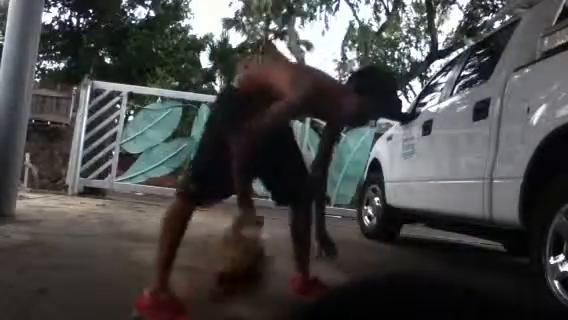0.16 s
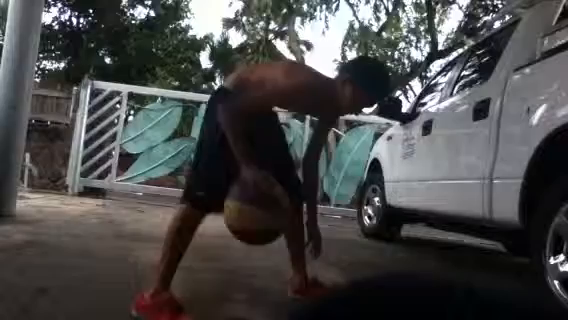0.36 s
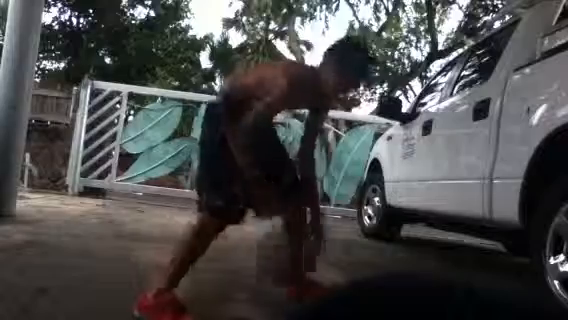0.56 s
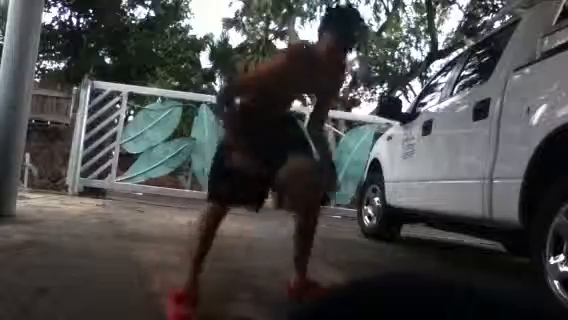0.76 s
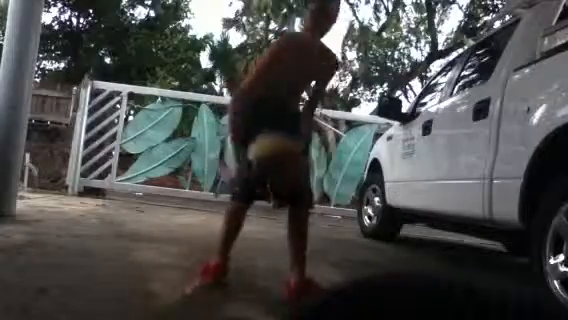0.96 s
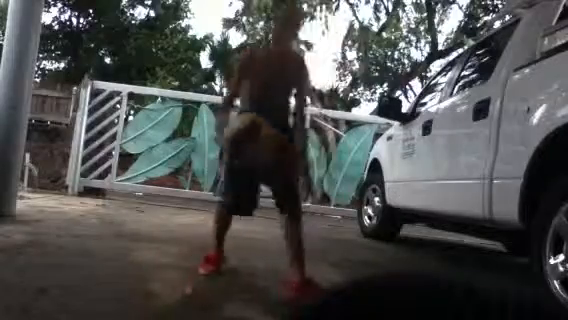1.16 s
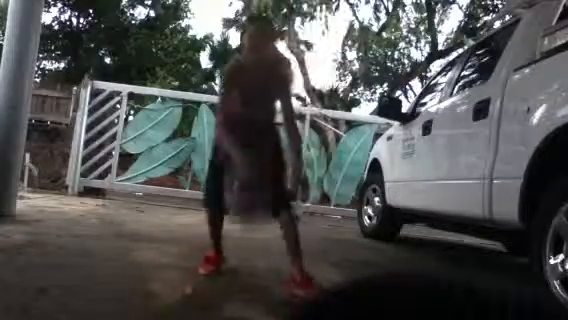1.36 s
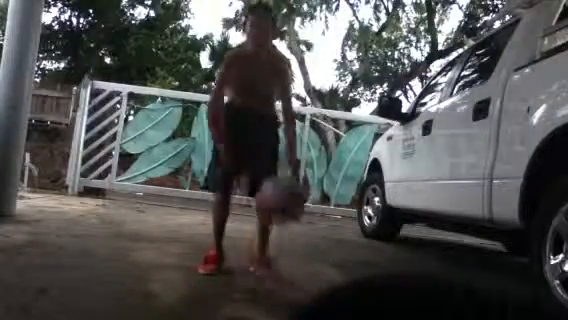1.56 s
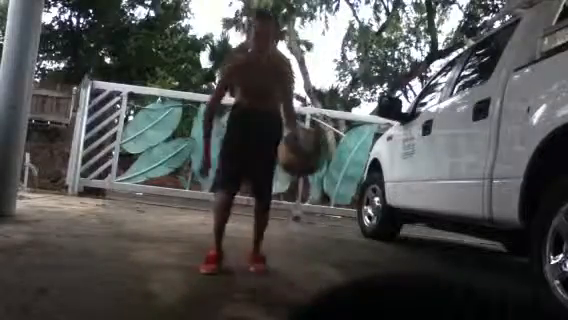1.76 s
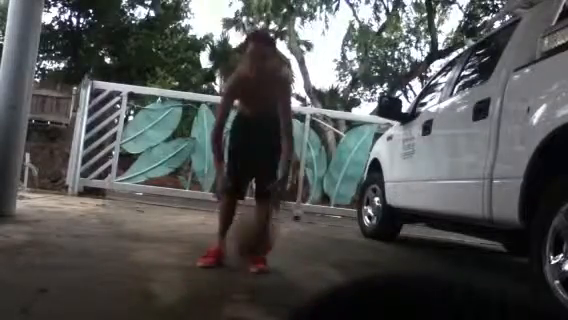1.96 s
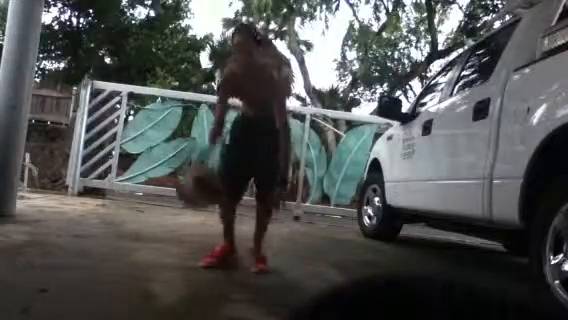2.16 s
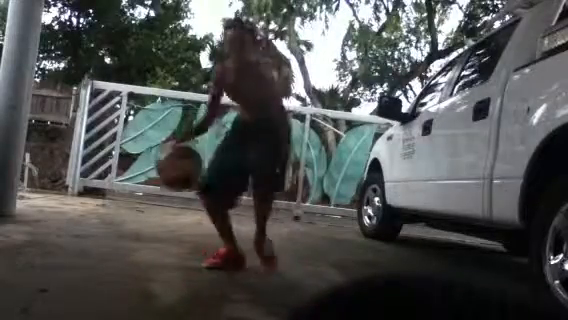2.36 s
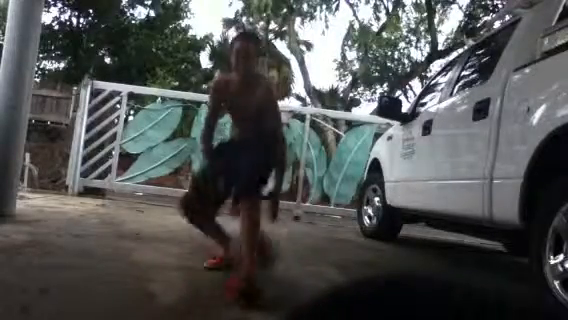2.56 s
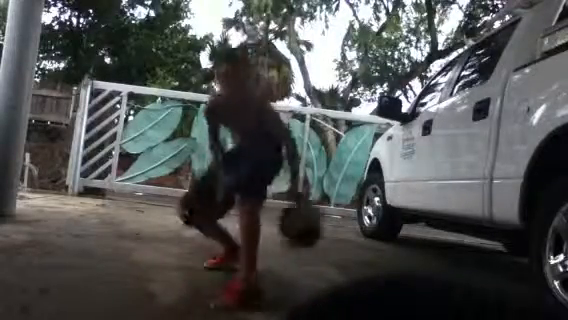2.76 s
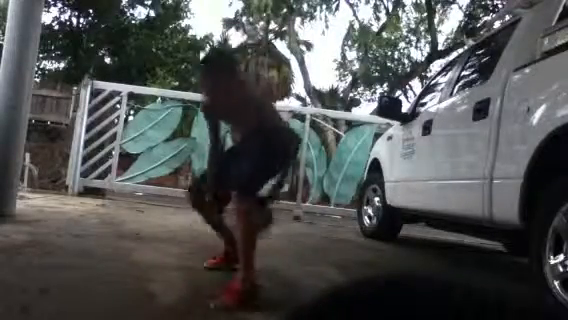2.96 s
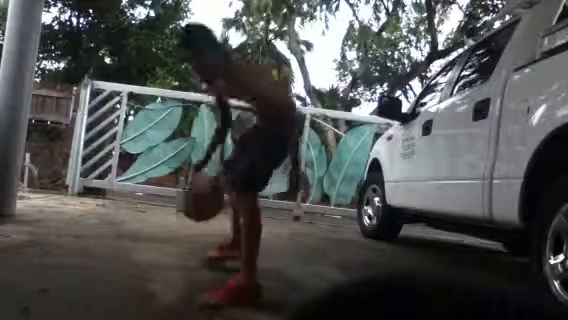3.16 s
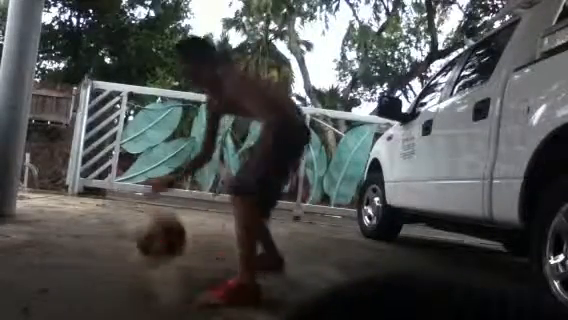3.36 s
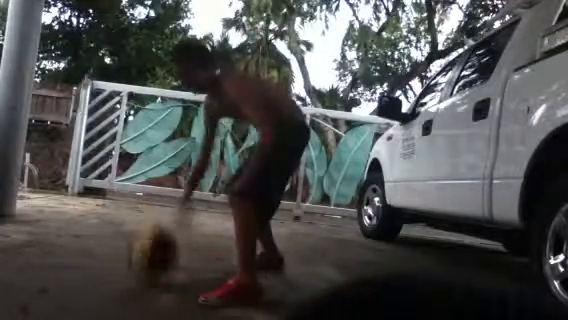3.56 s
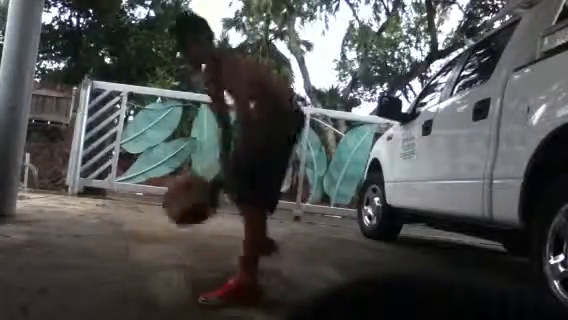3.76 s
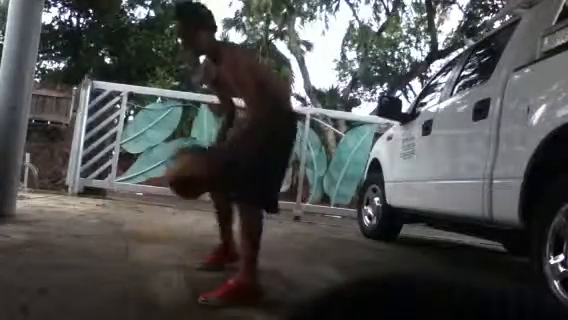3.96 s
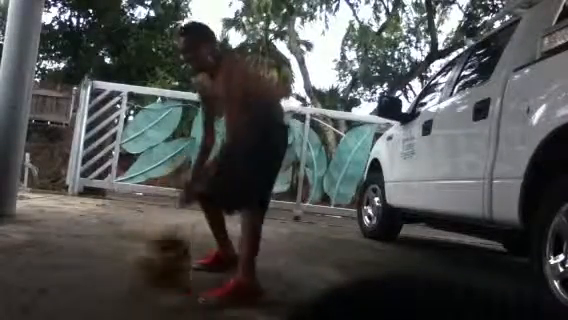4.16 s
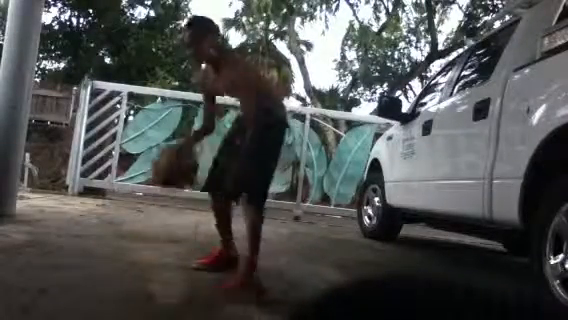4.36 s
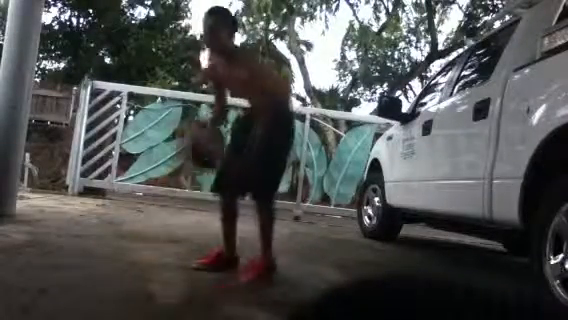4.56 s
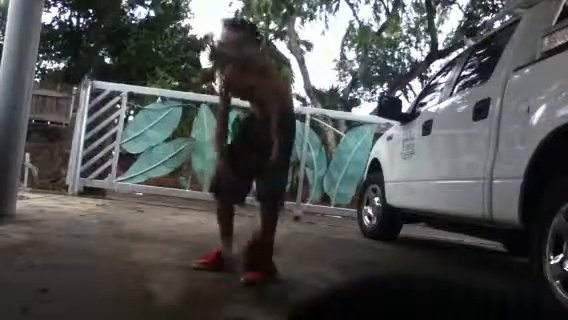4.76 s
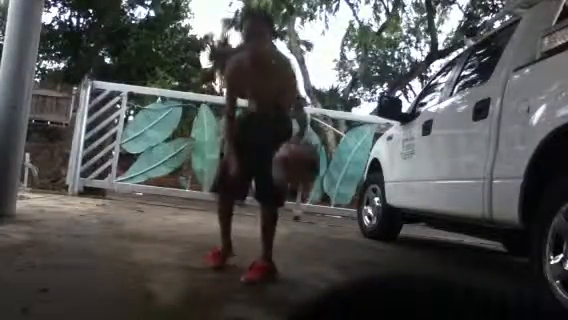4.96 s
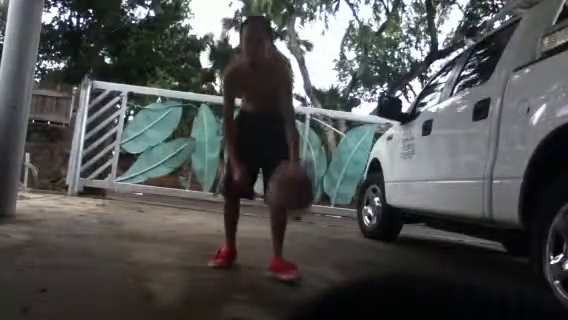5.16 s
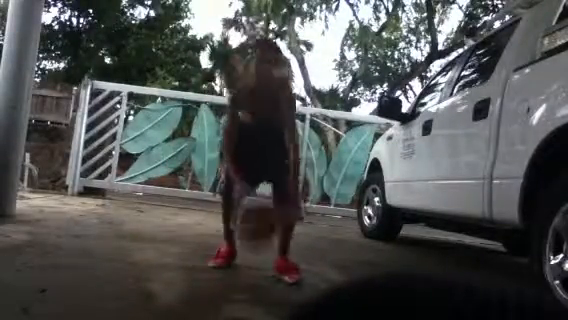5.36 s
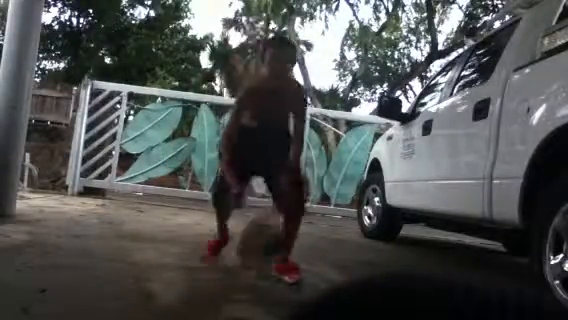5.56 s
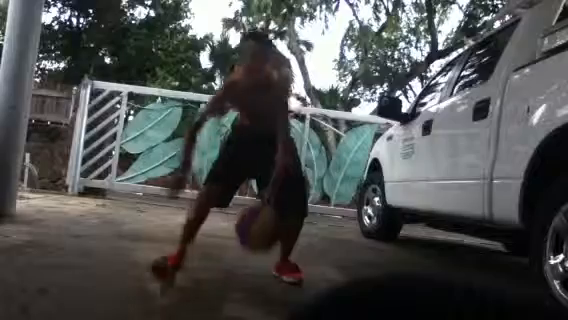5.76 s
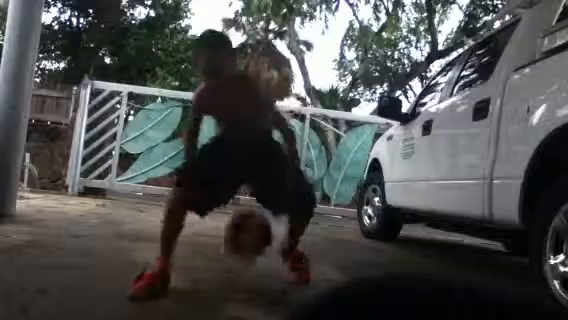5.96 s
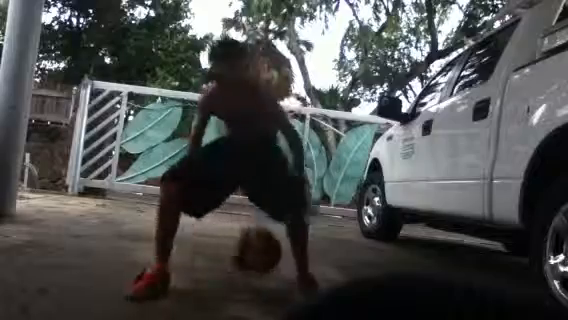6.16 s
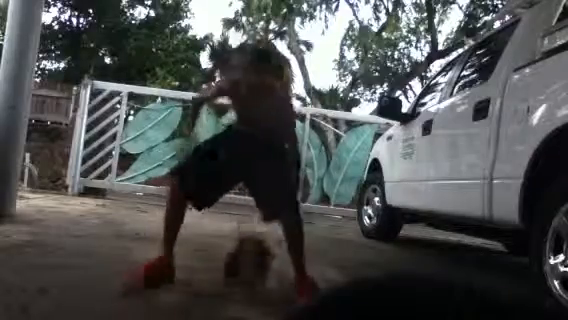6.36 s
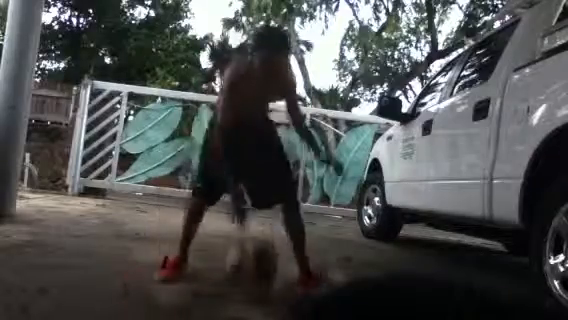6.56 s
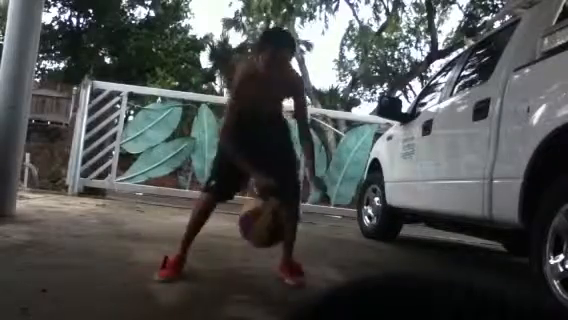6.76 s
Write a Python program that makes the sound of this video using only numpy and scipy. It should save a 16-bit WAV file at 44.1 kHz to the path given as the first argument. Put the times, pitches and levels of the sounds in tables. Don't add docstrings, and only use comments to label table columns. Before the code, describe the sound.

Seventeen loud basketball slaps strike a hard slab in just under seven seconds, irregularly spaced, with a cluster near the end. Between them come hollow palm thuds, rubber shoes dragging and groaning over grit, and weak leaf and traffic noise with a wavering low machine drone. Roof and parked truck return quick reflections; the small camera on the ground slightly flattens the hardest hits.

```python
import sys
import numpy as np
from scipy import signal
from scipy.fft import rfft, irfft, next_fast_len
from scipy.io import wavfile
from scipy.ndimage import uniform_filter1d, map_coordinates

SR = 44100
rng = np.random.default_rng(int(sys.argv[2]) if len(sys.argv) > 2 else 0)


def dump_mix(stems):
    frames = np.atleast_2d(stems).T
    limited = np.clip(frames, -1, 1)
    pcm = np.round(limited * 32767).astype(np.int16)
    wavfile.write(sys.argv[1], SR, pcm)


def voltage_ratio(level):
    return 10 ** (np.asarray(level, float) / 20)


N = 300762
LEAD = SR // 10

# t/s, strength/dB, slap level/dB, push level/dB, sharpness/dB
BOUNCES = [(-.0012, -4, -1.5, -18, -10), (0.309, -2.5, 0.5, -20.5, -12), (0.6994, -3, -2, -26, 33),
           (1.6025, -1, -6.5, -26.5, -3), (2.161, -1.5, -2.5, -22.5, 23), (2.7055, -0.5, -1.5, -28.5, 5),
           (3.0016, -3.5, -6.5, -22.5, 27), (3.479, -4.5, -3, -24.5, -25), (3.7386, -5, -4, -23, -14),
           (4.3302, -2.5, -3, -24, -14), (4.8928, -2, -2.5, -20.5, -7), (5.438, -3, -2, -22.5, 10),
           (5.7642, -3, 0, -22.5, -9), (6.0279, -7, -8, -26, -17), (6.2715, -4, -7, -36, -39),
           (6.4891, -6.5, -1, -20.5, -19), (6.7417, 0.3, -6.5, -25, -14)]
# f/Hz, level/dB, time to fall by 60 dB/s
BAY_MODES = [(67.2, -3, 0.18), (116.9, -18, 0.59), (165.1, -5, 0.25), (221, -7, 0.084), (292.4, -9, 0.22),
             (358.6, -23, 0.81), (430, -15.5, 0.23), (547, -28, 0.05)]
# f/Hz, level per Hz/dB
TAIL_COLOUR = [(59, -73), (100, 9.5), (394, -6.5), (668, -11), (997, -7.5), (1400, -8.5), (1760, -8),
               (5280, -14.5), (9520, -24.5), (11800, -34.5), (15500, -48)]
BLOCKS = (338, 1024, 570)


def bounces():
    # air mode f/Hz, air mode f/Hz, ring/dB, leg echo delay/ms, leg echo/dB
    spots = [(1180, 3190, 1, 7.1, -18), (1088, 687, 5, 1.5, -10), (1300, 1960, -2, 6.9, -22),
             (1507, 1700, -7, 6.6, -16), (1034, 6100, 2.5, 1.4, -4), (1303, 3600, 1.3, 2.1, -17),
             (1330, 917, 5.5, 1.5, -2), (1350, 2000, -1, 4.9, -28), (1937, 1280, -2, 0.61, -11),
             (2100, 3500, -1.5, 17, -22), (1300, 1700, 0, 10, -5), (1606, 1210, 2.5, 0.89, -9),
             (1356, 2200, 4, 2.2, -5), (1330, 790, 5.5, 1.69, -3), (1750, 800, 0.5, 0.63, -4),
             (1036, 2024, 6.5, 2.23, -10), (2460, 1000, 8, 2.5, -17)]
    # delay/ms, level/dB
    late_echoes = [(7.5, -53), (11, -43), (14.8, -16), (17, -32), (30.2, -14)]
    truck_door = (5, -5.5)
    out, t = np.zeros(N + LEAD), np.arange(SR * 3 // 4) / SR
    for (s, db, slap_db, push_db, sharp_db), (hz1, hz2, ring_db, *legs) in zip(BOUNCES, spots):
        at = s + 0.00096
        add(out, at, voltage_ratio(slap_db - 1.2) * slap(sharp_db, size=600))
        for ms, echo_db in (legs, truck_door):
            add(out, at + ms / 1000, voltage_ratio(slap_db + echo_db - 3.5) * slap(sharp_db, size=600))
        for ms, wall_db in late_echoes:
            a, b = rng.standard_normal(2)
            echo = voltage_ratio(db + wall_db + 0.83 * b) * slap(sharp_db, size=600)
            add(out, at + ms / 1000 * (1 + 0.027 * a), echo)

        dent = -np.sin(2 * np.pi * 170 * t) * voltage_ratio(-60 * t / 0.035)
        boom = ring(BAY_MODES, t, 0.0064, scatter_db=2.5, blur=0.094)
        low = voltage_ratio(push_db + 2.5) * dent + voltage_ratio(push_db - 1.5) * boom

        ping = ring([(hz1, 0, .06), (hz2, -3, .04)], t, 0.00054, scatter_db=1.0, blur=0.11)
        add(out, at, voltage_ratio(slap_db + ring_db - 26.0) * ping)

        crack = coloured(rng.standard_normal(len(t)), TAIL_COLOUR[3:]) * voltage_ratio(-60 * t / 0.019)
        add(out, at + .0004, voltage_ratio(db - 21) * crack)

        air = filtered(carport(t), lambda f: resonance(hz1, 70)(f) - 0.68 * resonance(hz2, 110)(f))
        tail = carport(t) + voltage_ratio(ring_db + 4.5) * air
        add(out, at, voltage_ratio(db - 26.5) * tail + low)
    return out[LEAD:]


def slap(sharp_db, size):
    # f/Hz, width/Hz, level/dB
    skin_modes = [(1960, 880, 7.5), (3600, 340, 3.5), (6600, 8200, -9)]
    edge_hz = 8500
    kick = np.zeros(size)
    kick[0] = 1
    scatter = rng.standard_normal((3, 2))
    skin = [(c * (1 + 0.092 * a), w, db + 2 * b) for (c, w, db), (a, b) in zip(skin_modes, scatter)]

    def response(f):
        soft = (edge_hz ** 2 / (edge_hz ** 2 - f * f + 1.4j * f * edge_hz)) ** 3
        push = voltage_ratio(sharp_db + 11.5) * 1j * f / (900 + 1j * f)
        return soft * (push + sum(voltage_ratio(db) * resonance(c, w)(f) for c, w, db in skin))

    click = filtered(kick, response)
    return click / np.abs(click).max()


def carport(t):
    # f/Hz, time to fall by 60 dB/s
    decay_times = [(150, 0.38), (500, 0.47), (1500, 0.46), (4000, 0.44), (8000, 0.47), (14000, 0.31)]
    hz, ts, z = signal.stft(rng.standard_normal(len(t)), SR, nperseg=256)
    level_db = along(TAIL_COLOUR, hz)[:, None] - 60 * ts / along(decay_times, hz)[:, None]
    shape = voltage_ratio(level_db) * patches(z.shape, 2.7, size=16)
    tail = signal.istft(z * shape, SR, nperseg=256)[1][:len(t)]
    start_rms = np.sqrt(np.mean(tail[:SR // 20] ** 2))
    return tail / start_rms * (1 - np.exp(-t / 0.00084))


def ring(modes, t, attack, scatter_db, blur):
    out = 0
    for hz, db, t60 in modes:
        a, b, c = rng.standard_normal(3)
        wander = blur * np.interp(t, np.arange(100) / 120, np.cumsum(rng.standard_normal(100)))
        level = voltage_ratio(db + scatter_db * a - 60 * t / t60)
        out = out + level * np.sin(2 * np.pi * hz * (1 + 0.014 * b) * t + 1.55 * c + wander)
    return out * (1 - np.exp(-t / attack))


def pats():
    # t/s, thud/dB, smack/dB, thud f/Hz, smack f/Hz
    touches = [(0.205, -32, -25.5, 290, 1760), (0.565, -46.5, -33.5, 345, 2290),
               (0.596, -39, -55, 240, 1300), (0.861, -54, -34, 262, 2820), (0.998, -45, -43, 353, 1770),
               (1.439, -41, -36.5, 280, 1180), (2.398, -44, -35.5, 301, 910),
               (2.675, -45, -37.5, 323, 2010), (3.287, -38, -41, 304, 1840), (3.386, -36, -45, 290, 910),
               (3.625, -34, -35, 352, 1220), (5.378, -40.5, -40, 456, 1080),
               (5.872, -22.5, -19, 317.3, 1330), (5.985, -47, -32, 330, 1680), (6.149, -28, -39, 290, 1270),
               (6.245, -39, -30, 221, 1160), (6.646, -19, -34, 281, 1240)]
    out, t = np.zeros(N + LEAD), np.arange(SR // 2) / SR
    for s, db, smack_db, hz, smack_hz in touches:
        thud_modes = [(hz, 0, .06), (hz * 1.35, -14, .25), (hz * 0.98, -14, .25)]
        thud = ring(thud_modes, t, 0.0014, scatter_db=2.0, blur=0.34)
        smack = coloured(rng.standard_normal(len(t)), TAIL_COLOUR[3:]) * voltage_ratio(-60 * t / 0.017)
        smack = smack + voltage_ratio(9) * filtered(smack, resonance(smack_hz, 160))
        boom = ring(BAY_MODES[:4], t, 0.011, scatter_db=3, blur=0.36)
        bright = voltage_ratio(smack_db) * (0.56 * smack + voltage_ratio(-18.5) * carport(t))
        add(out, s, voltage_ratio(db + 0.5) * thud + voltage_ratio(db - 12) * boom + bright)
    return out[LEAD:]


def soles():
    # t/s, rise/s, hold/s, scrape/dB, fine grit/dB
    slide_events = [(0.989, 0.026, .04, -43, -1.5), (1.018, 0.086, .03, -36, -6.5),
                    (1.134, .05, 0.06, -39, -1.5), (1.244, 0.054, 0.13, -45, -5.5),
                    (1.38, 0.13, 0.18, -45.5, -5.5), (1.676, .06, 0.056, -40, -11),
                    (1.958, .05, .03, -46.5, -6), (1.994, 0.08, 0.042, -42, -8),
                    (3.246, 0.081, 0.017, -43, -7.5), (3.369, 0.067, .02, -38.5, -3),
                    (4.066, 0.067, 0.025, -43, -9.5), (4.38, 0.055, 0.043, -37.5, -10.5),
                    (4.55, 0.036, 0.058, -43, -6), (5.125, 0.066, 0.079, -53, -5),
                    (6.528, 0.043, 0.03, -32, -6),
                    (0.189, 0.038, 0.022, -35.5, -6), (0.4, 0.018, 0.009, -51.5, -2),
                    (0.832, 0.045, 0.022, -47, -3.5), (2.336, 0.054, 0.18, -52.5, -20),
                    (3.594, 0.026, .03, -52.5, -3), (5.367, 0.017, 0.017, -53, -1.5),
                    (5.863, 0.0066, 0.0063, -42, -2), (5.93, 0.056, .03, -45.5, -12.5),
                    (6.205, .05, 0.0088, -38, -7.5), (6.31, 0.027, .06, -42, -14),
                    (6.437, 0.044, .01, -39, -5.5), (6.64, .02, .05, -42.5, -11)]
    # t/s, rise/s, hold/s, level/dB, f/Hz
    groan_events = [(0.195, .01, 0.049, -35, 350), (0.39, 0.025, .02, -45.5, 430),
                    (0.983, 0.048, 0.11, -38.5, 920), (1.133, 0.036, .05, -34, 548),
                    (1.158, 0.026, 0.096, -39, 720), (1.405, 0.052, .06, -44.5, 330),
                    (1.515, 0.036, .05, -41, 583), (1.638, 0.025, 0.053, -43.5, 780),
                    (1.99, 0.074, 0.042, -49, 670), (2.378, .015, .02, -46.5, 670),
                    (3.254, 0.062, 0.022, -46, 700), (3.381, 0.023, 0.018, -44.5, 586),
                    (3.597, .03, 0.046, -46.5, 370), (4.076, 0.046, .03, -46, 517),
                    (4.377, 0.028, .02, -41.5, 557), (4.442, 0.016, 0.037, -38, 780),
                    (4.551, 0.045, 0.053, -44.5, 970), (5.143, 0.048, .04, -54, 850),
                    (5.371, 0.028, 0.019, -41.5, 940), (5.867, 0.0077, 0.01, -41, 313),
                    (5.923, .02, .05, -49, 430), (6.224, .03, 0.023, -40, 930),
                    (6.519, 0.033, 0.07, -37, 700), (6.639, 0.013, 0.044, -35, 310)]
    sole_hz = [280, 400, 560, 780, 1080]
    # f/Hz, level per Hz/dB
    scrape_colour = [(530, -21), (900, -11.5), (1130, 2), (1240, -3.5), (1960, 1), (4260, -5.5),
                     (6000, -19), (7800, -30), (13200, -120)]
    # f/Hz, level per Hz/dB
    grit_colour = [(2650, -7.5), (4500, -6.5), (5020, -1), (5830, -2), (8760, -5), (11500, -9.5),
                   (15500, -20.5)]
    all_slides = slide_events
    knots, t = np.arange(0, N / SR, .002), np.arange(N) / SR
    slides, groans = strokes(all_slides, knots), strokes(groan_events, knots)

    def power(gains):
        return np.interp(t, knots, np.sqrt(np.sum(gains ** 2, axis=0)))

    groan_hz = np.transpose(groan_events)[4]
    places = np.interp(np.log(groan_hz), np.log(sole_hz), np.arange(len(sole_hz)))[:, None]
    rubber = grains(patchy_db=-2.5)
    body = 0
    for k, c in enumerate(sole_hz):
        share = np.sqrt(np.clip(1 - abs(places - k), 0, 1))
        groan = unit(filtered(rubber, lambda f: resonance(c, .45 * c)(f) ** 2))
        body = body + power(groans * share) * groan

    scrape = power(slides) * coloured(grains(patchy_db=1.5), scrape_colour)
    fine_gain = power(slides * voltage_ratio(np.transpose(all_slides)[4])[:, None])
    return scrape + body + fine_gain * coloured(grains(patchy_db=3.5), grit_colour)


def strokes(rows, t):
    sag_db_per_s, release_db_per_s, swell = 36.5, 148, 1.3
    s, rise, hold, db = np.transpose(rows)[:4, :, None]
    rise = rise + 0.00089
    held = np.clip(t - s - rise, 0, hold)
    after = np.maximum(t - s - rise - hold, 0)
    level = voltage_ratio(db - sag_db_per_s * held - release_db_per_s * after)
    return np.clip((t - s) / rise, 0, 1) ** swell * level


def grains(patchy_db):
    clumps = map_coordinates(rng.standard_normal(N // 300 + 4), [np.arange(N) / 300])
    sizes = np.minimum(rng.exponential(size=N), 4.5)
    x = rng.standard_normal(N) * voltage_ratio(3.4 * sizes + 0.31 * clumps)
    z = signal.stft(x, nperseg=256)[2]
    return signal.istft(z * patches(z.shape, patchy_db, size=14), nperseg=256)[1][:N]


def patches(shape, depth_db, size):
    return voltage_ratio(depth_db * unit(uniform_filter1d(rng.standard_normal(shape), size=size, axis=1)))


def hush():
    # f/Hz, level per Hz/dB
    outdoor_colour = [(15, -56), (44, -14), (122, -3.5), (215, -5), (305, 2), (358, -16), (433, -3.5),
                      (702, -13.5), (1750, -11.5), (2350, -16), (2770, -16.5), (4370, -19), (15500, -31)]
    # t/s, level/dB
    drone_levels = [(0.0, -60), (0.51, -68), (2.14, -94), (2.28, -63), (2.68, -73.5), (2.89, -68),
                    (3.36, -67), (3.63, -78), (4.05, -61), (4.46, -64.5), (5.32, -64), (5.91, -78),
                    (6.27, -65), (6.82, -60)]
    drone_hz, hush_db = 119, -56.5
    t = np.arange(N) / SR
    drone = unit(filtered(rng.standard_normal(N), lambda f: 1 / (1 + ((f - drone_hz) / 1.6) ** 2)))
    drone = voltage_ratio(np.interp(t, *np.transpose(drone_levels))) * drone
    return voltage_ratio(hush_db) * coloured(rng.standard_normal(N), outdoor_colour) + drone


def unit(x):
    return x / np.sqrt(np.mean(x ** 2) + 1e-20)


def along(points, hz):
    f, v = np.transpose(points)
    return np.interp(np.log(hz + 1), np.log(f + 1), v)


def filtered(x, response):
    m = next_fast_len(len(x) + 8192)
    return irfft(rfft(x, m) * response(np.fft.rfftfreq(m, 1 / SR)), m)[:len(x)]


def coloured(x, spectrum):
    return unit(filtered(x, lambda hz: voltage_ratio(along(spectrum, hz))))


def resonance(c, w):
    return lambda f: 1j * f * w / (c * c - f * f + 1j * f * w)


def add(track, s, sound):
    part = track[round(s * SR) + LEAD:][:len(sound)]
    part += sound[:len(part)]


def scene():
    low_hz = 60
    cut = lambda f: (f * f / (f * f - low_hz ** 2 - 1.2j * f * low_hz)) ** 2
    return (filtered(bounces() + pats(), cut) + soles() + hush())[None]


def dulled_around_slaps(x):
    first, length, short = BLOCKS
    dull = filtered(x, lambda f: 1 / (1 + (f / 2600) ** 12))
    capped = filtered(x, lambda f: 1 / (1 + (f / 13200) ** 40))
    gap, leak, cap = np.zeros((3, N))
    for s, _, db, *_ in BOUNCES[1:]:
        hit = round((s + .0011) * SR)
        start = hit - (hit - first - short) % length
        if np.mean(x[hit - 900:hit - 250] ** 2) < voltage_ratio(-47) ** 2:
            gap[start:hit - 130] = 1
        leak[hit - 130:hit] = voltage_ratio(db - 45)
        early = hit - start < length // 2
        cap[hit + (-250 if early else 150):start + 2 * length] = 1
    gap, cap = uniform_filter1d(np.array([gap, cap]), size=40)
    noise = leak * coloured(rng.standard_normal(N), TAIL_COLOUR[3:])
    return x + gap * (dull - x) + cap * (capped - x) + noise


def thinned(x):
    # f/Hz, share from 0 to 1
    lost_bands = [(7000, 0), (10000, .1), (12000, .3), (13500, .55), (15500, .75)]
    first, length, _ = BLOCKS
    grid = dict(fs=SR, window='cosine', nperseg=2 * length, noverlap=length)
    hz, t, z = signal.stft(np.pad(x, (length - first, 0)), **grid)
    chance = np.repeat(rng.random((len(hz) // 6 + 1, len(t))), 6, axis=0)[:len(hz)]
    to_slap = np.abs(t[:, None] - (length - first) / SR - np.transpose(BOUNCES)[0]).min(axis=1)
    whole = to_slap < length / SR
    share = along(lost_bands, hz)[:, None] * ~whole
    kept = z * (chance >= share) / np.sqrt(1 - share)
    return signal.istft(kept, **grid)[1][length - first:][:N]


def low_pass(x):
    return signal.sosfilt(signal.butter(12, 15620, fs=SR, output="sos"), x)


def record(dry):
    top, hard = .76, 6
    x = dry[0] / (1 + np.abs(dry[0] / top) ** hard) ** (1 / hard)
    mix = thinned(dulled_around_slaps(x))[None]
    return low_pass(mix)


dry = scene()
out = record(dry)
dump_mix(out)
```